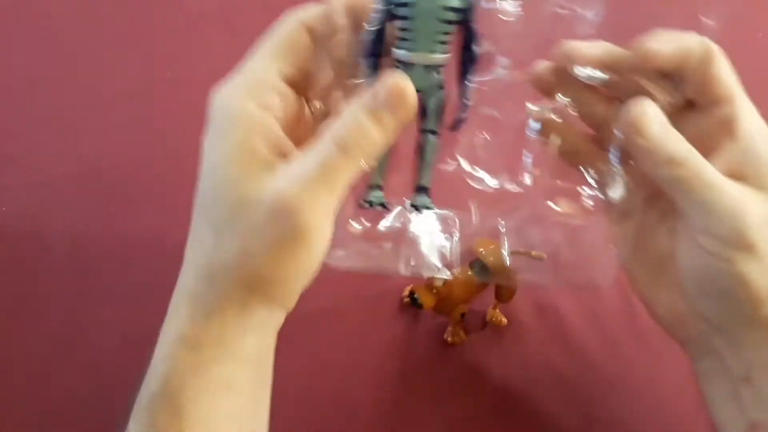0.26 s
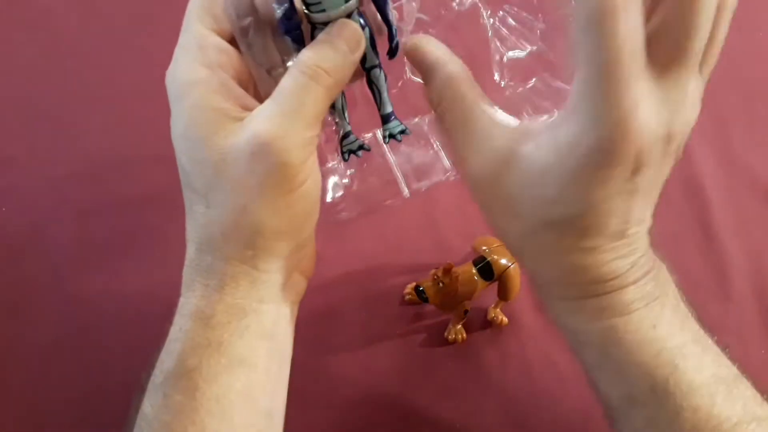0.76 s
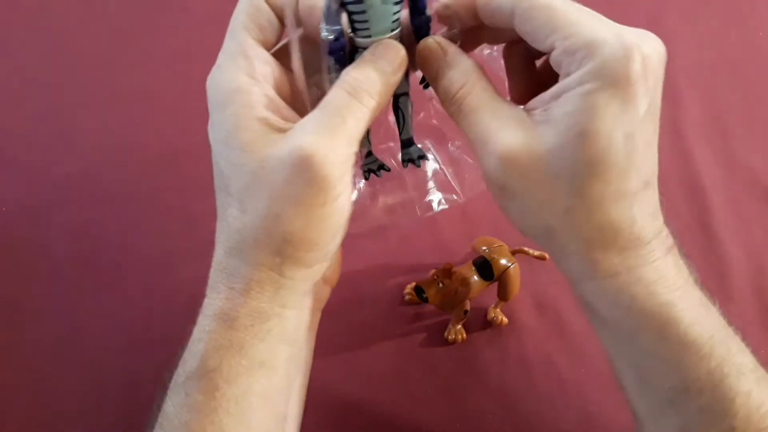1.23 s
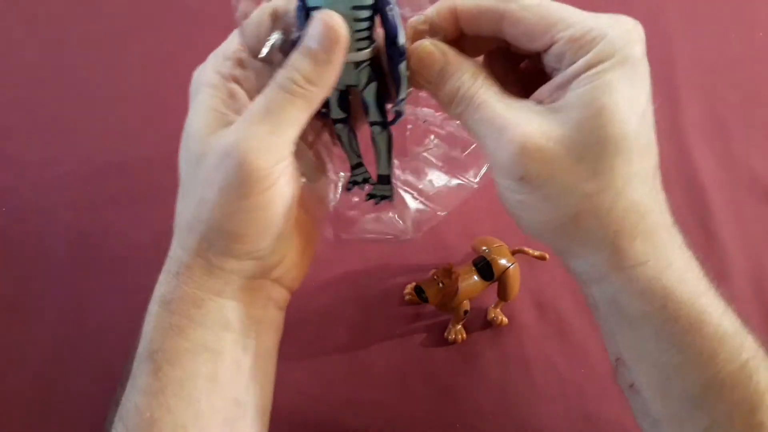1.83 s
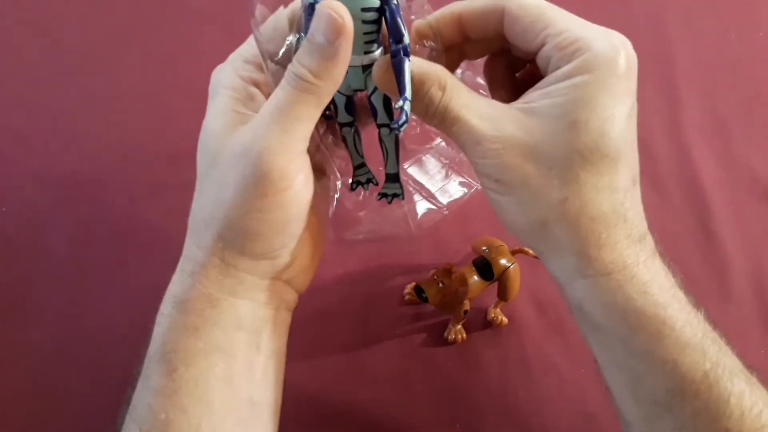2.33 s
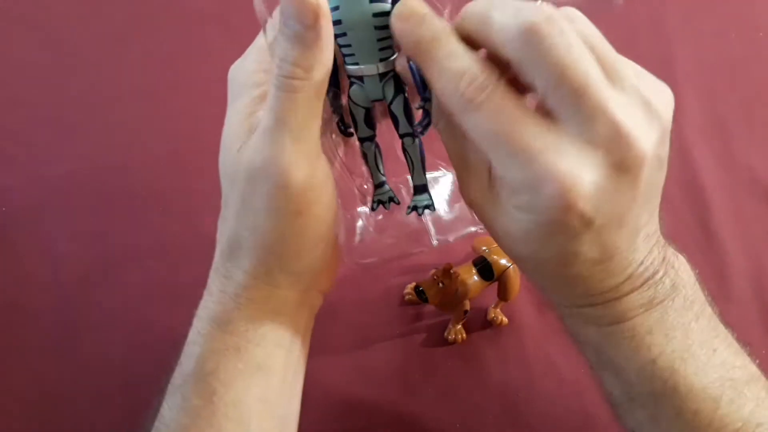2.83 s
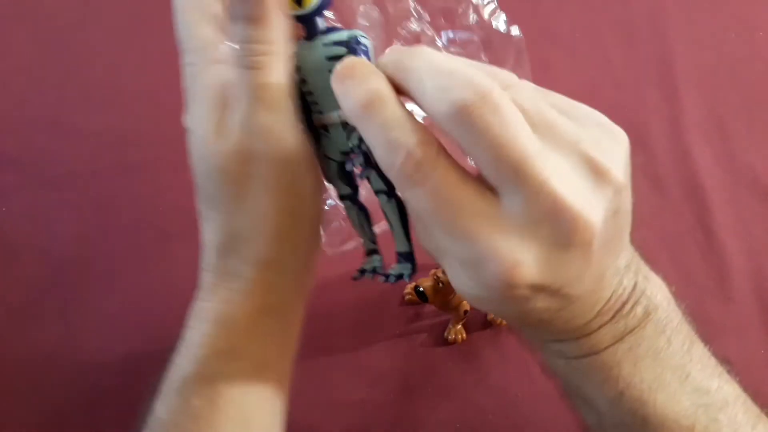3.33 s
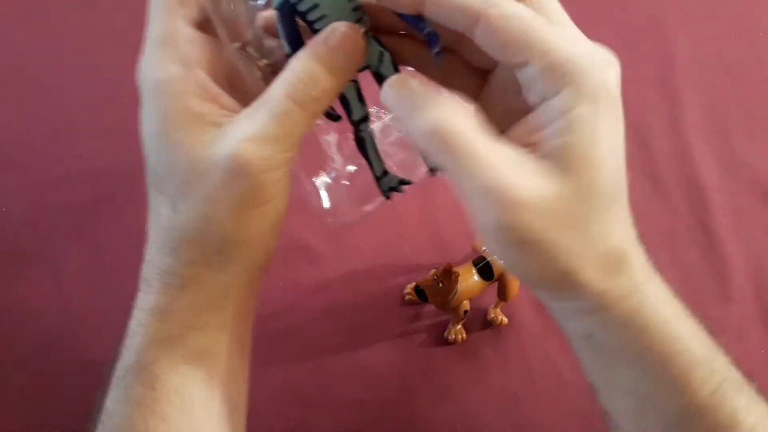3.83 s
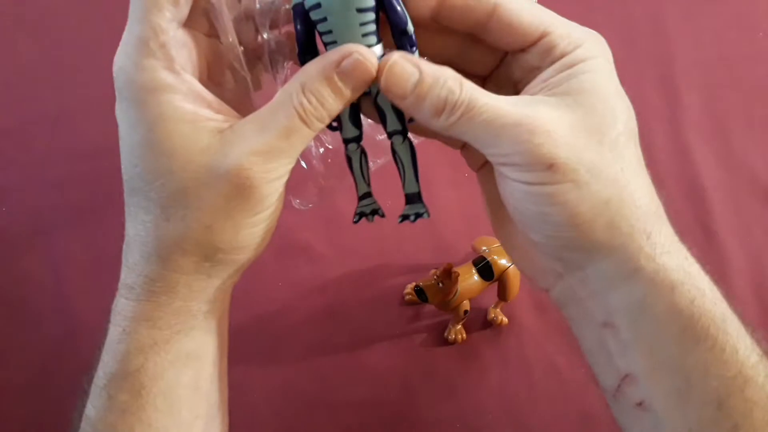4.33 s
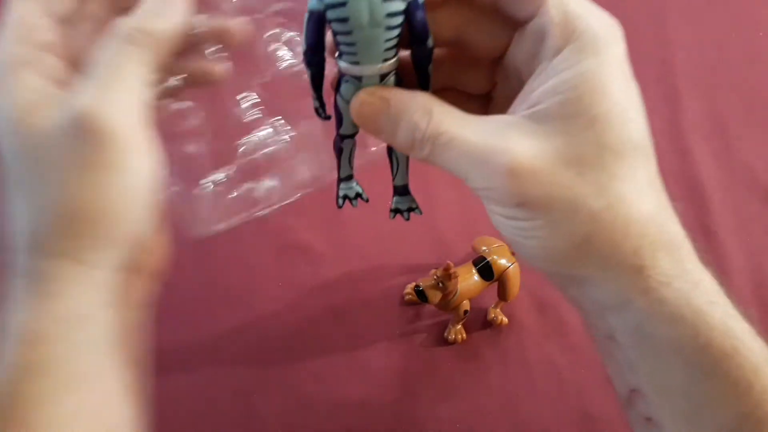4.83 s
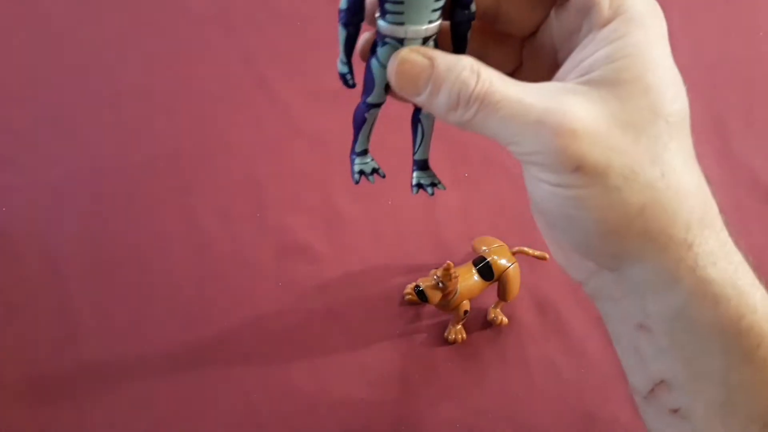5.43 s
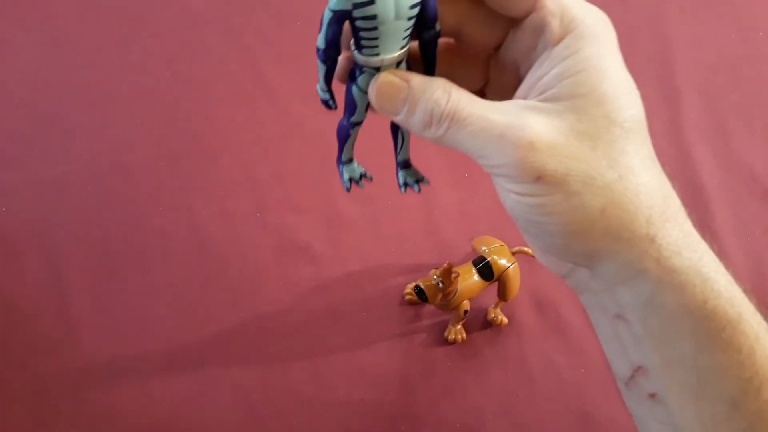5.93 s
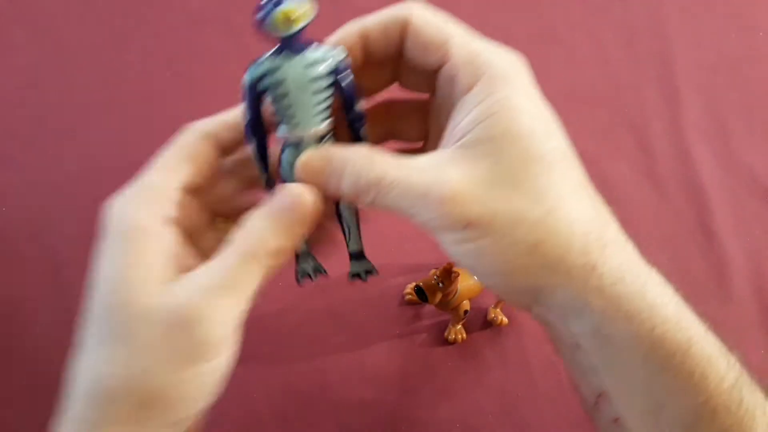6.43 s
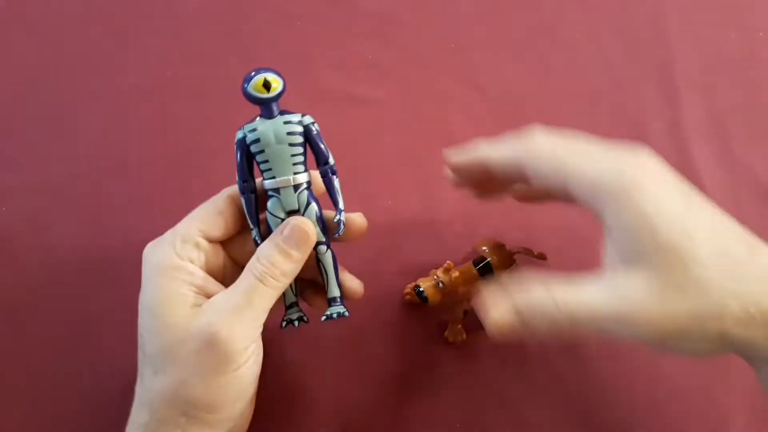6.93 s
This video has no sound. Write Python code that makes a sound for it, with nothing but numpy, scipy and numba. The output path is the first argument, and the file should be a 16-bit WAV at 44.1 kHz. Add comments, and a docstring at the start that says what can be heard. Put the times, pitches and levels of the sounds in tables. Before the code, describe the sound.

Stiff clear film buckles and snaps under fingers, with rubbing, small creases clicking and dull hollow knocks. A dense crackling run gives way to separate bursts, then light isolated clicks. After a short lull, the discarded plastic crackles and settles on the table off to the left. A quiet indoor background follows, with faint hum, hiss and rapid minute ticking. Near phone microphone, short room echo.

```python
"""Thin moulded plastic snaps, crackles and rubs as hands work a toy out of its tray, then drop the tray aside.
Each dent rings briefly, thumps and cracks: damped sines for the pitch, banded noise bursts for the fold.
Random clicks make the creases, noise the rubbing fingers, low damped sines the knocks on the table.
Decaying noise responses make the rattle and small room; a phone hears it all through two ports.
A low hum, microphone hiss and a faint regular ticking remain when the tray is gone."""
import sys
import numpy as np
from scipy import signal
from scipy.fft import rfft, irfft, next_fast_len
from scipy.io import wavfile
from scipy.ndimage import map_coordinates
from numba import njit

SR = 44100
rng = np.random.default_rng(int(sys.argv[2]) if len(sys.argv) > 2 else 0)


def to_wav(sig):
    """Store sig (one row per channel, or 1-D mono) as 16-bit WAV at the path in sys.argv[1].

    Samples outside -1..1 are clipped; the rate is SR.
    """
    pcm = np.clip(np.atleast_2d(sig), -1, 1) * 32767
    pcm = np.round(pcm).astype(np.int16)
    wavfile.write(sys.argv[1], SR, pcm.T)  # frames by channels


N = 316197
TIME = np.arange(N) / SR

# Dents snapping through. Each row: start in seconds, nominal level in dB, ring in Hz,
# crack and fizz in dB against that level.
DENT_SNAPS = [(0.056, -24, 658.5, -32.5, -39), (0.236, -16.5, 1257, -12, -24.5),
              (0.271, -17, 903, -16, -19.5), (0.296, -8.5, 3576, -10.5, -24.5),
              (0.3295, -3, 1300, -17.5, -25.5), (0.343, -6, 1904, -18, -25.5), (0.473, -33, 3430, -14, -23),
              (0.630, -25.5, 690, -15, -35), (0.677, -34, 1200, -37, -37), (0.700, -34, 953, -30, -39),
              (0.815, -21.5, 700, -23, -27), (0.846, -22.5, 1630, -12.5, -20.5),
              (0.857, -18, 970, -24, -39), (0.922, -32, 932, -16, -15), (.932, -33.5, 900, -19, -25),
              (0.946, -33, 958.6, -4.5, -9), (0.991, -33.5, 985, -19, -17.5),
              (1.074, -30.5, 1080, -15.5, -19.5), (1.096, -24.5, 3000, -22.5, -41.5),
              (1.105, -24.5, 3290, -18.5, -22.5), (1.149, -22.5, 4370, -3.5, -12.5),
              (1.18, -25.5, 1560, -13, -13.5), (1.1933, -19, 2490, -13.5, -11.5),
              (1.199, -9, 4020, -21.5, -19.5), (1.205, -16, 2000, -19, -31.5),
              (1.2197, -16.5, 4060, -14, -22), (1.252, -10.5, 3685, -16, -30),
              (1.2524, -10, 1180, -15, -33), (1.288, -9, 1362, -17, -11), (1.299, -17, 994, -19, -19.5),
              (1.323, -19, 1060, -15, -31.5), (1.353, -15, 2760, -10, -12),
              (1.3835, -19, 2116, -11.5, -25.5), (1.4, -12.5, 2260, -19, -31.5),
              (1.418, -18.5, 2700, -19.5, -28), (1.429, -22.5, 1101, -14, -19),
              (1.452, -12.5, 3890, -11.5, -20.5), (1.471, -13.5, 3000, -8.5, -10.5),
              (1.4805, -10, 1093, -9.5, -27), (1.496, -4, 3285, -20, -29.5),
              (1.537, -4.5, 2600, -24.5, -37.5), (1.577, -14.5, 1106, -13.5, -25),
              (1.592, -12, 2630, -13.5, -24.5), (1.696, -18.5, 785, -37, -34), (1.802, -18, 4000, -6.5, -7),
              (1.818, -18, 1600, -9, -19), (1.838, -18.5, 3150, -24.5, -36), (1.8533, -20, 2014, -14, -34),
              (1.8848, -22, 3010, -2, -7), (1.897, -25, 3210, -2.5, -17), (1.904, -20, 1090, -27, -28),
              (1.923, -18, 4050, -38, -22.5), (1.946, -18.5, 3470, -32, -22),
              (1.96, -19.5, 1810, -14.5, -38), (2.015, -19.5, 2830, -12, -27), (2.074, -19, 2200, -24, -42),
              (2.097, -28, 1210, -27, -35), (2.115, -24.5, 1210, -31, -40),
              (2.138, -17.5, 1500, -20.5, -25), (2.171, -28.5, 673, -38, -41),
              (2.212, -26.5, 735, -22, -42), (2.278, -45, 678, -24, -33), (2.293, -29.5, 3200, -9, -23),
              (2.334, -39, 720, -26, -20), (2.3613, -24.5, 1920, -18.5, -35.5),
              (2.385, -32.5, 1780, -2, 0.5), (2.3967, -11, 3020, -24.5, -26),
              (2.424, -14, 2600, -13.5, -18.5), (2.435, -12.5, 1570, -19, -26.5),
              (2.529, -7.5, 2160, -16, -17.5), (2.532, -20, 890, -11, -28), (2.599, -34, 724, -26.5, -28),
              (2.671, -50.5, 800, -28.5, -32), (2.712, -47, 794, -32, -43), (2.802, -43, 1004, -30, -33.5),
              (2.845, -12, 2000, -26, -34.5), (2.87, -10.5, 2170, -12.5, -20),
              (2.878, -22, 1180, -18.5, -25.5), (2.910, -4.5, 1246, -18.5, -26),
              (2.917, -13, 1320, -2, -24), (2.984, -14.5, 1276, -29.5, -45), (3.08, -20, 2042, -30, -38),
              (3.1, -33, 4500, -10, -17), (3.102, -34, 2550, -15.5, -20.5), (3.1256, -14, 2372, -23, -22),
              (3.134, -8, 2900, -18.5, -17), (3.154, -32, 1500, -23.5, -30),
              (3.188, -23.5, 1210, -3.5, -12), (3.216, -27.5, 1060, -9, -25),
              (3.243, -18.5, 1940, -16, -23.5), (3.314, -19, 1210, -11, -21),
              (3.3356, -11.5, 1940, -14.5, -20.5), (3.451, -26, 3500, -7, -16), (3.464, -27, 900, -29, -38),
              (3.528, -34.5, 808, -31, -45), (3.646, -34, 1150, -22.5, -37), (3.7, -43.5, 2320, -7, -19),
              (3.716, -27, 1050, -34, -37), (3.821, -21.5, 1860, -12, -12.5), (3.897, -34, 630, -17, -39),
              (3.96, -31.5, 1420, -8.5, -12), (4.038, -28.5, 916, -27.5, -36),
              (4.0446, -38, 1690, -25, -35), (4.17, -44.5, 1590, -24, -37), (4.205, -45.5, 1110, -32, -37),
              (4.234, -31.5, 1470, -30, -45), (4.366, -40.5, 1700, -11.5, -21.5),
              (4.521, -25.5, 1072, -16.5, -30), (4.597, -31, 2480, -16, -26), (4.638, -43, 1100, -25, -35),
              (4.678, -34.5, 1410, -14, -25), (4.787, -20.5, 667, -11, -13),
              (5.027, -48.5, 640, -14.5, -19), (5.421, -25.5, 833, -30.5, -17),
              (5.443, -22, 2470, -22, -12), (5.566, -26, 1776, -23, -27), (5.586, -38, 3180, -8, -21),
              (5.6095, -15, 2160, -16.5, -22.5)]
# Squeezes and pulls that make the film crackle. Each row: time of full strength in seconds,
# hold in seconds, crackle level in dB, brightness in dB.
FILM_SQUEEZES = [(0.072, 0.03, -66, -4), (0.243, 0.072, -47, -3), (0.339, 0.0025, -22, -1),
                 (0.627, 0.12, -51.5, -2.5), (0.769, 0.0025, -59, -15), (0.841, 0.2, -53.5, -4.5),
                 (1.086, 0.23, -47.5, -11), (1.209, 0.233, -36, -4.5), (1.448, 0.13, -37.5, 9.5),
                 (1.658, 0.46, -46.5, 7), (1.818, 0.13, -41, 0.5), (2.03, 0.093, -52.5, 3),
                 (2.14, 0.051, -46, -9), (2.335, 0.0032, -63, -19), (2.422, 0.016, -38.5, -12),
                 (2.578, 0.009, -54, -2), (2.669, 0.13, -71.5, -11.5), (2.872, 0.059, -52, 1.5),
                 (2.96, 0.033, -42.5, -9), (3.04, 0.019, -54.5, -13), (3.14, 0.09, -46.5, -9),
                 (3.22, 0.06, -46.5, -13), (3.329, 0.025, -43.5, -6), (3.472, 0.027, -55.5, -3.5),
                 (3.707, 0.0066, -47, -10), (3.88, 0.0053, -57, 3), (3.968, 0.0065, -58.5, -8),
                 (4.089, 0.024, -66.5, -8.5), (4.2, 0.058, -67, -12), (4.38, 0.034, -64.5, -2.5),
                 (4.56, 0.069, -62.5, -5.5), (4.736, 0.011, -45.5, -0.5), (4.796, 0.0033, -38.5, -2),
                 (5.04, 0.022, -71.5, -0.5), (5.166, 0.05, -51, 3.5), (5.229, 0.0032, -51.5, -13),
                 (5.296, .05, -50, -4.5), (5.422, 0.029, -40.5, 1.5), (5.519, 0.11, -47, -1.5),
                 (5.604, 0.012, -39, -4.5), (5.67, 0.086, -46.5, -4.5), (5.744, 0.087, -38.5, -2),
                 (5.838, 0.031, -35.5, -2)]
# Hollow knocks of the whole tray and of hands on the table. Each row: start in seconds,
# nominal level in dB, main ring in Hz, its T60 in seconds.
TRAY_KNOCKS = [(0.168, -42, 140, 0.1), (.19, -40, 114, 0.17), (.208, -42, 397, 0.045),
               (.299, -26, 277, 0.052), (.329, -15.5, 602, 0.068), (.343, -13, 603, 0.067),
               (.814, -10.5, 490, 0.01), (0.817, -30, 565, 0.071), (.836, -23.5, 350, 0.022),
               (.855, -24.5, 613, 0.023), (0.821, -30, 220, 0.059), (0.861, -36, 199, 0.12),
               (1.431, -29.5, 232, .05), (1.803, -19.5, 139, 0.024), (1.875, -25, 660, 0.031),
               (2.408, -31.5, 706, 0.05), (2.439, -25.5, 478, 0.046), (2.558, -44, 308, 0.04),
               (2.578, -40, 358, 0.071), (2.909, -30, 130, 0.04), (3.715, -39.5, 337, 0.05),
               (3.819, -38.5, 572, 0.056), (4.115, -52.5, 312.4, 0.039), (4.521, -35, 368, 0.038),
               (4.72, -52, 544, 0.076), (4.765, -39, 576, 0.095), (4.79, -38.5, 280, 0.064),
               (5.218, -39, 638, 0.066), (5.428, -40.5, 90, 0.11), (5.727, -31.5, 334, 0.062),
               (5.743, -20, 405, 0.093), (5.762, -26.5, 430, 0.075), (6.678, -44.5, 87.56, 0.054),
               (7, -45, 109.4, 0.087)]
# Where the tray is. Each row: time in seconds, delay of the right port in samples, left minus right in dB.
TRAY_PLACE = [(0, 2.5, 0), (1.2, 2.43, 0), (3, 3.92, 0.5), (4.5, 4.54, 0.5), (5.1, 19.4, 5), (6, 17.3, 2),
              (6.4, 4.7, 1.5)]
# Decay of the room. Each row: frequency in Hz, T60 in seconds before the final fade.
ROOM_DECAY = [(200, .3), (1000, 0.15), (4000, 0.13), (12000, 0.09)]
# Tone of the room. Each row: frequency in Hz, gain in dB.
ROOM_TONE = [(100, -26.5), (400, 5), (1200, -0.5), (3500, -5), (7000, -9.5), (16000, 1)]
# Part of the echoes that differs between the ports. Each row: frequency in Hz, gain in dB.
ECHO_SPREAD = [(300, -10.5), (1000, 0.5), (3000, 8.5), (12000, 5.5)]
# Ticks off the beat. Each row: start in seconds, nominal level in dB.
OFFBEAT_TICKS = [(6.592, -60), (7.1502, -63.5)]
# Hum level, sinking while the film is worked. Each row: time in seconds, level in dB.
HUM_LEVEL = [(0, -76), (.2, -57.5), (1.5, -73.5), (2, -83), (2.25, -91), (3.2, -83), (4.4, -88.5),
             (4.6, -70), (5.7, -60), (5.95, -68), (7.17, -68)]
# Tone of the hum. Each row: frequency in Hz, gain in dB.
HUM_TONE = [(30, -11), (68, -2.5), (116, -5), (165, -7), (205, -2.5), (260, -17.5), (320, -27.5),
            (700, -25.5), (1500, -40.5)]
# Hiss level. Each row: time in seconds, level in dB.
HISS_LEVEL = [(0, -78), (1.5, -61.5), (2.7, -79.5), (4.4, -71), (6.3, -74.5), (6.4, -70), (6.5, -73),
              (6.57, -68.5), (6.7, -73.5)]
# Tone of the hiss. Each row: frequency in Hz, gain in dB.
HISS_TONE = [(300, 4), (1900, -2), (5000, -4), (6300, -0.5), (7300, -1), (8300, -3.5), (9500, 2),
             (12500, 1.5), (15500, 0)]
# Tone of the phone's ports. Each row: frequency in Hz, gain in dB.
MIC_TONE = [(6000, 1), (7300, 2.5), (9000, -6.5), (12500, -3), (16000, -7)]

# Film bands that a click excites: low edge in Hz, high edge in Hz, part that differs between the ports.
BODY, LOW, HIGH = (250, 800, .25), (800, 2000, .45), (2000, 4500, .8)
CRACK, FIZZ = (4500, 8000, 1.1), (8000, 16200, .8)
FILM_T60_S = 0.024  # reference decay, scaled for each band and source
FOLD_DB, FIZZ_DB = 5.5, 10  # peaks of crack and fizz over their means
AFTER_SPREAD_S, AFTER_DB = 0.017, -12  # delay spread; level step that a random draw scales
RISE_DB_PER_S, FALL_DB_PER_S = 496, 356
LANDS_S, LANDING_DB_PER_S = 5.425, 4000  # the tray meets the table at once
TRAY_FREE_S = 5.1
CREAK_START_S, CREAK_STEPS, CREAK_GAP_S, CREAK_SLOWING_S = 1.7265, 10, .0064, .00006
CREAK_HZ, CREAK_DB = 3000, -25
SQUEAK_S, SQUEAK_HZ, SQUEAK_DB, SQUEAK_T60_S = 5.344, 1750, -40, .07
ROOM_DB, TRAY_DB, TRAY_T60_S = -9, -6.5, 0.15
TICKS_FROM_S, TICK_EVERY_S, TICK_HZ, TICK_T60_S = 5.027, .1024, 7440, 0.0049
TICK_DB, TICK_LOUDEST_S, TICK_FADE_DB_PER_S = -56.5, 6.51, 16
TOP_HZ = 15900


def snaps():
    """A dent rings a few cycles at its own pitch while the fold runs across it as a broad crack."""
    s, db, hz, crack_db, fizz_db = np.transpose(DENT_SNAPS)
    octaves = np.log2(hz / 1500)  # low dents have more body, high ones more edge
    out = grains(s, hz, 6, db + 4.5, 0, .4)
    out = out + bursts(s, db - 28.5 - 6 * octaves, BODY, 1.3 * FILM_T60_S)
    out = out + bursts(s, db - 13.5 - 6.9 * octaves, LOW, 0.49 * FILM_T60_S)
    out = out + bursts(s, db - 11 + 4 * octaves, HIGH, 0.43 * FILM_T60_S)
    out = out + bursts(s, db + crack_db + FOLD_DB, CRACK, .55 * FILM_T60_S)
    return out + bursts(s, db + fizz_db + FIZZ_DB, FIZZ, 0.4 * FILM_T60_S)


def aftershocks():
    """Each snap shakes three neighbouring creases loose, each with its own pitch; later ones tend to be weaker."""
    s, db, hz = np.array(DENT_SNAPS).T[:3, :, None]
    late, pitch, weak = rng.random((3, len(DENT_SNAPS), 3))
    start = s + .002 + AFTER_SPREAD_S * late
    crease_hz = hz * 2 ** (1.6 * (pitch - .5))
    return grains(start, crease_hz, 5, db + AFTER_DB * (late + weak), 0, 0.34)


def handling():
    """Creases click at random, few large and many tiny, over rubbing fingers and a little low air from the hands."""
    gain, treble_gain = squeezes()
    u = rng.random((9, 6000))
    s = u[0] * N / SR
    largest_db = np.where(s < TRAY_FREE_S, 16, 11)
    size_db = np.minimum(-6.5 * np.log(u[1]), largest_db)
    rub_gain = undb(np.where(TIME < TRAY_FREE_S, -10, -4))  # more rub once the tray slides free
    layers = []
    for k, edges in enumerate((BODY, LOW, HIGH, CRACK, FIZZ)):
        # a separate random level in each band colours every click
        clicks = bursts(s, size_db + 16 * u[2 + k], edges, 0.5 * FILM_T60_S)
        rub = band(port_noise(edges[2]), *edges[:2])
        layers.append(unit(clicks) + rub_gain * unit(rub))
    body, low, high, crack, fizz = layers
    air = unit(band(port_noise(.25), 130, 260))
    crease_hz = 600 * 2 ** (3.2 * u[7])
    pops = unit(grains(s, crease_hz, 13.0, size_db + 12 * u[8], 6 * (u[2] - u[3]), .3))
    film = undb(-5.5) * pops + undb(-7.0) * body + undb(-3.5) * low + undb(-4.0) * high
    film = film + undb(-23.0) * air
    treble = undb(-2.5) * crack + undb(-3.0) * fizz
    return undb(-1.5) * (gain * film + treble_gain * treble)


def squeezes():
    """Each squeeze rises, holds and falls away; gains of the lower crackle and of its treble."""
    s, held, db, bright_db = np.array(FILM_SQUEEZES).T[:, :, None]
    coarse = TIME[::32]
    rise = np.where(np.abs(s - LANDS_S) < .04, LANDING_DB_PER_S, RISE_DB_PER_S)
    before, after = np.maximum(s - coarse, 0), np.maximum(coarse - s - held, 0)
    gain = undb(db - rise * before - FALL_DB_PER_S * after)
    totals = [np.sqrt(np.sum(g ** 2, axis=0)) for g in (gain, gain * undb(bright_db))]
    return [np.interp(TIME, coarse, total) for total in totals]


def creak():
    """Stick and slip of a fold against the toy: nearly even, slowing ticks that ring alike."""
    k = np.arange(CREAK_STEPS)
    timing, level, pitch = rng.standard_normal((3, CREAK_STEPS))
    s = CREAK_START_S + CREAK_GAP_S * (k + .04 * timing) + CREAK_SLOWING_S * k ** 2
    db = CREAK_DB + 1.55 * level
    rings = grains(s, CREAK_HZ * (1 + 0.082 * pitch), 12, db, 0, 0.27)
    return rings + bursts(s, db - 11.5, CRACK, 0.32 * FILM_T60_S)


def squeak():
    """An edge of the sliding tray rubs and sings as two close tones that beat."""
    hz = SQUEAK_HZ * np.array([1, 1.03])
    return grains(SQUEAK_S, hz, SQUEAK_HZ * SQUEAK_T60_S, SQUEAK_DB - np.array([0, 7]), 0, 2)


def knocks():
    """The tray rings in three low modes when it flexes or lands, over a dull rumble."""
    s, db, hz, t60 = np.array(TRAY_KNOCKS).T[:, :, None]
    cycles = t60 * hz * [1, .8, .4]
    rings = grains(s + [0, .004, .002], hz * [1, 1.15, .52], cycles, db - [1, 5, 9], 0, 0.49)
    s, db, hz = s[:, 0], db[:, 0], hz[:, 0]
    below_300_db = 14 * np.minimum(np.log2(hz / 300), 0)  # deep knocks have less body noise
    rings = rings + bursts(s, db - 13.5 + below_300_db, BODY, .05)
    return rings + bursts(s, db - 25.0, (110, 350, .5), 0.072)


def echoes(x, places=5):
    """Tray and table rattle on, the room adds its tail; paths blend in a steady cycle for the moving hands."""
    t = np.arange(SR // 3) / SR
    noise = rng.standard_normal((places, 3, len(t)))
    noise = noise[:, :1] + colour(noise[:, 1:], ECHO_SPREAD)  # shared part plus each port's own
    tray = unit(noise * decay(t, TRAY_T60_S))
    hz, t60 = np.transpose(ROOM_DECAY)
    room = 0
    for k in range(len(hz)):
        share = [(f, 0 if j == k else -40) for j, f in enumerate(hz)]
        room = room + colour(noise, share) * decay(t, t60[k])
    room = unit(colour(room * np.minimum(t / 0.0025, 1), ROOM_TONE))
    fade = 1 - t / t[-1]
    response = (undb(TRAY_DB) * tray + undb(ROOM_DB) * room) * fade / np.sqrt(len(t))
    # each path takes its turn 3.7 times a second; 128 / 35 evens out the power
    turn = np.cos(np.pi * (3.7 * TIME - np.arange(places)[:, None] / places)) ** 8
    weight = turn * 128 / 35 / places
    sent = np.sqrt(weight) * x.mean(axis=0)
    return signal.oaconvolve(sent[:, None], response, axes=2).sum(axis=0)[:, :N]


def ticks():
    """Tiny regular clicks in a narrow high resonance, swelling and fading, with a few off the beat."""
    s = np.arange(TICKS_FROM_S, N / SR, TICK_EVERY_S)
    fade_db = np.minimum(TICK_FADE_DB_PER_S * np.abs(s - TICK_LOUDEST_S), 7)
    beat = np.c_[s, TICK_DB - fade_db]
    s, db = np.r_[beat, OFFBEAT_TICKS].T[:, :, None]
    hz = TICK_HZ * np.array([1, .88])
    return grains(s + [0, .0008], hz, TICK_T60_S * TICK_HZ, db + [3, -2], 19.5, 1.2)


def background():
    """Shaped noise: hum much alike in both ports, hiss unrelated."""
    hum = rng.standard_normal(N) + 0.44 * rng.standard_normal((2, N))
    hum = unit(colour(hum, HUM_TONE))
    hiss = unit(colour(rng.standard_normal((2, N)), HISS_TONE))
    return undb(curves(HUM_LEVEL)[0]) * hum + undb(curves(HISS_LEVEL)[0]) * hiss


def grains(s, hz, cycles, db, pan_db, rise):
    """Rings that swell over rise cycles and lose 60 dB over a number of cycles; positive pan_db leans left."""
    values = np.broadcast_arrays(s, hz, cycles, db, pan_db, rise)
    s, hz, cycles, db, pan_db, rise = (np.ravel(a) * 1. for a in values)
    hz = np.clip(hz, 30, .45 * SR)
    left, right = undb(db + pan_db / 2), undb(db - pan_db / 2)
    return ring((s * SR).astype(np.int64), hz, cycles / hz, np.abs(rise), left, right, count=N)


@njit
def ring(start, hz, t60, rise, left, right, count):
    """Damped sines with a soft start, one for each grain."""
    out = np.zeros((2, count))
    for k in range(len(start)):
        # one complex turn per sample carries both pitch and decay
        step = np.exp(2j * np.pi * hz[k] / SR - np.log(1000) / (t60[k] * SR))
        closing = np.exp(-hz[k] / (rise[k] * SR))
        z, closed = 1 + 0j, 1.
        for i in range(start[k], min(count, start[k] + int(t60[k] * SR))):
            out[0, i] += left[k] * z.imag * (1 - closed)
            out[1, i] += right[k] * z.imag * (1 - closed)
            z *= step
            closed *= closing
    return out


def bursts(s, db, edges, t60):
    """Decaying bursts of noise in one band, one at each time, rising over 16 samples."""
    lo_hz, hi_hz, apart = edges
    kick = np.zeros(N)
    np.add.at(kick, np.clip(s * SR, 0, N - 1).astype(int), undb(db))
    shape = signal.lfilter(np.ones(16) / 16, [1, -decay(1 / SR, t60)], kick)
    noise = band(shape * port_noise(apart), lo_hz, hi_hz)
    return noise * np.sqrt(SR / 2 / (hi_hz - lo_hz))  # make up for the power outside the band


def port_noise(apart):
    """Noise that the two ports share in part."""
    return (rng.standard_normal(N) + apart * rng.standard_normal((2, N))) / np.sqrt(1 + apart ** 2)


def decay(t, t60):
    """Exponential decay that loses 60 dB in t60 seconds."""
    return np.exp(-np.log(1000) * t / t60)


def band(x, lo_hz, hi_hz):
    """Keep one band of frequencies."""
    return signal.sosfilt(signal.butter(3, [lo_hz, hi_hz], "bandpass", fs=SR, output="sos"), x)


def colour(x, points):
    """Shape the spectrum by (Hz, dB) points, joined along log frequency."""
    size = next_fast_len(x.shape[-1])
    hz, db = np.transpose(points)
    bin_hz = np.arange(size // 2 + 1) * SR / size
    gain = undb(np.interp(np.log(bin_hz + 1), np.log(hz), db))
    return irfft(rfft(x, size) * gain, size)[..., :x.shape[-1]]


def curves(table):
    """Columns of a table as curves over time."""
    s, *columns = np.transpose(table)
    return [np.interp(TIME, s, c) for c in columns]


def unit(x):
    """Scale to an RMS of one."""
    return x / np.sqrt(np.mean(x ** 2))


def undb(db):
    """Decibels to amplitude."""
    return 10 ** (np.asarray(db) / 20)


def scene():
    """Film and echoes reach the ports with the tray's delay and balance; ticks, hum and hiss join dry."""
    film = band(snaps() + aftershocks(), 180, 21000)
    film = film + handling() + creak() + squeak() + knocks()
    lag, pan_db = curves(TRAY_PLACE)
    left, right = (film + echoes(film)) * undb([pan_db / 2, -pan_db / 2])
    right = map_coordinates(right, [np.arange(N) - lag], order=3)
    return np.array([left, right]) + ticks() + background()


def record(dry):
    """The phone's ports lift treble near 7 kHz and dull it above; deep bass and top are cut, loud peaks rounded."""
    dry = colour(dry, MIC_TONE)
    dry = signal.sosfilt(signal.butter(2, 60, "highpass", fs=SR, output="sos"), dry)
    dry = 1.4 * np.tanh(dry / 1.4)
    return signal.sosfilt(signal.ellip(10, .2, 70, TOP_HZ, fs=SR, output="sos"), dry)


dry = scene()
out = record(dry)
to_wav(out)
```